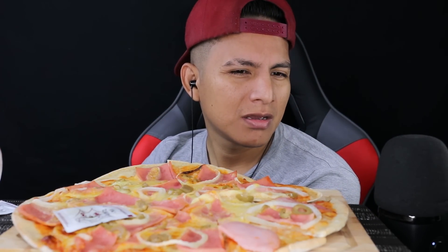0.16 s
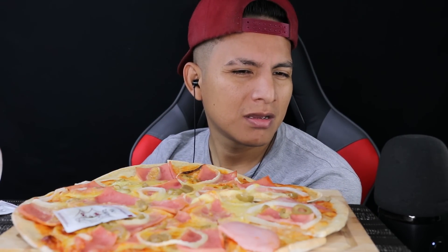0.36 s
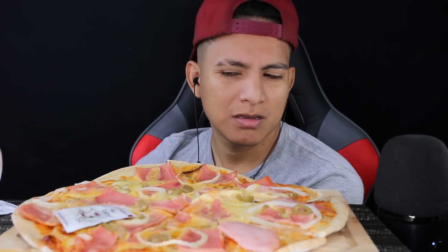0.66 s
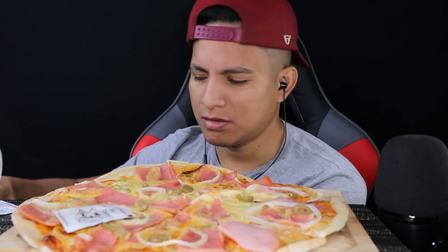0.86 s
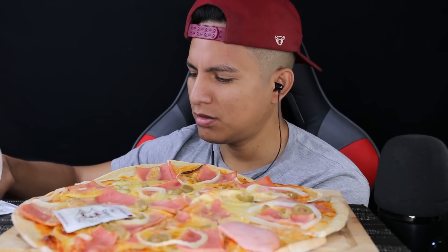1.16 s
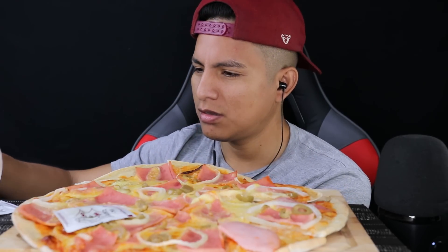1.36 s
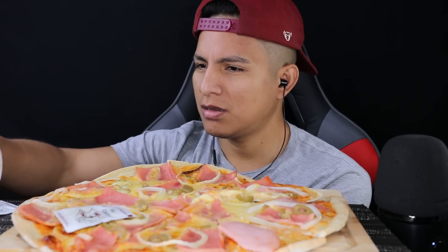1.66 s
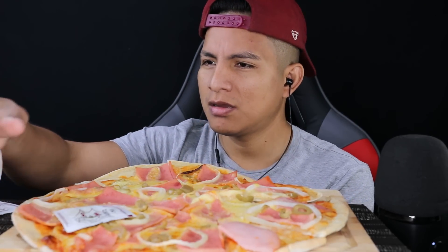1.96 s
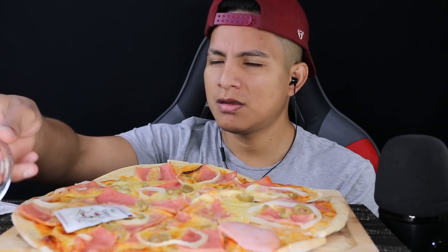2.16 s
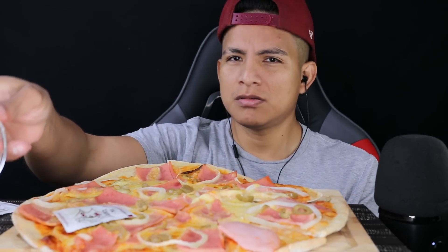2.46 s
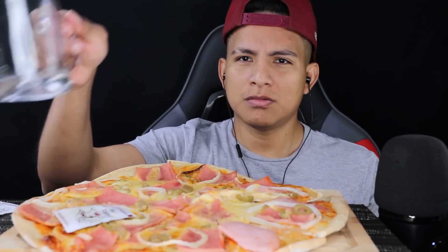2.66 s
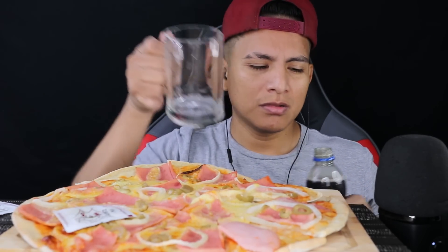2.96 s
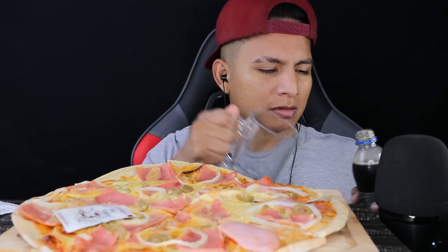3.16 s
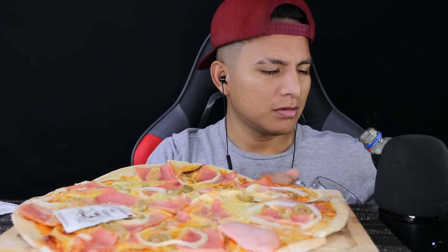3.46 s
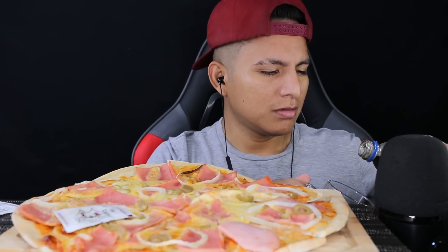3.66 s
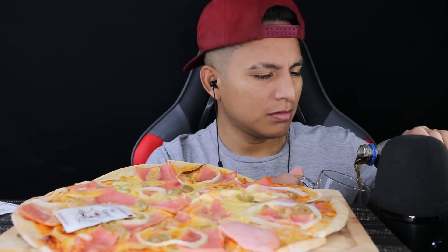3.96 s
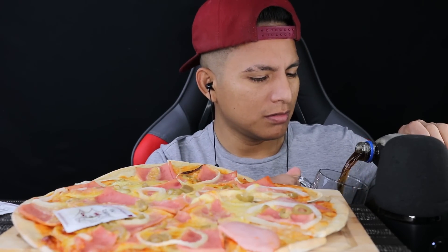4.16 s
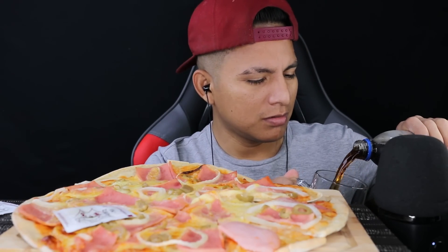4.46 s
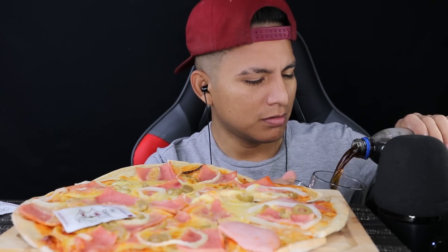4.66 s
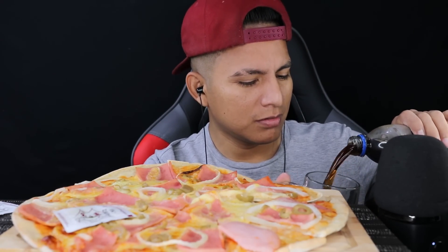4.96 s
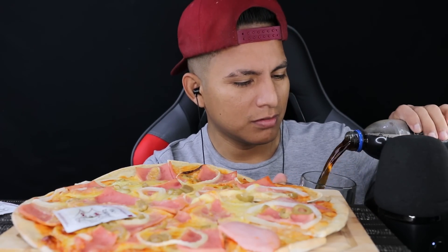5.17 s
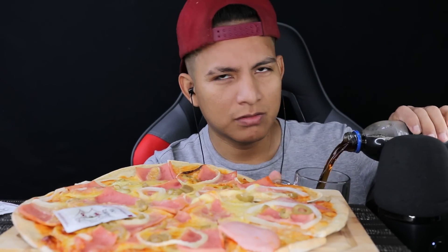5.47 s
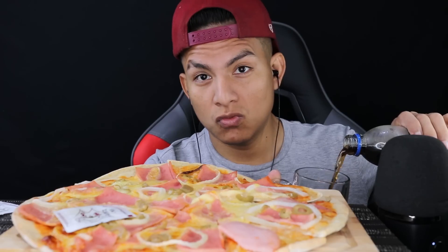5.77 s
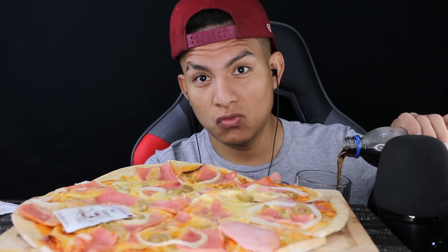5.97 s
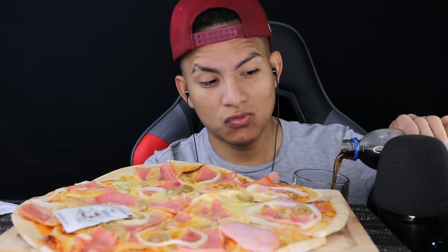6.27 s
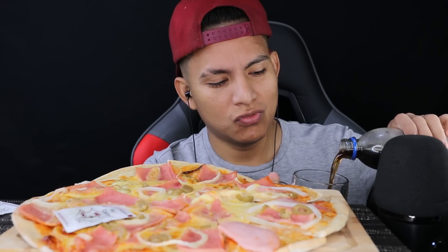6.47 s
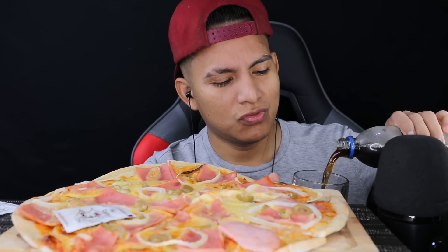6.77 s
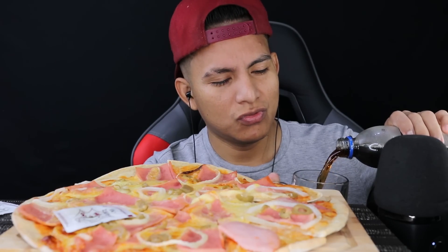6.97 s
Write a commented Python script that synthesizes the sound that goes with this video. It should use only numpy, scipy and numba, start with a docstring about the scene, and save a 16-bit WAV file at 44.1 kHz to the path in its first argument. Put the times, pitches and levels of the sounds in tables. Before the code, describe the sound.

Close stereo microphones at a table catch a strong burst of escaping gas, dulling quickly, and a hard plastic crack with a thump. Sparse clicks, cloth rustle and faint squeaky rubs come next over low room tone. Then soda streams into a glass mug just left of centre: crisp foam fizz, irregular watery plops, glassy ringing, glugs and a climbing pitch, still pouring at the end.

```python
"""A soda bottle is opened at a table in a small quiet room: gas, shaped noise, hisses out at once.
The cap cracks off and a glass mug is fetched: short noise bursts, grainy rustles, slipping groans, low thumps.
Then the drink is poured close by, left of the middle: foam fizzes, splashes ring the glass and the air column
above the drink, whose pitch climbs as the mug fills, while the plastic bottle glugs and pops.
Near the end the bottle hums briefly; room tone and faint hums lie under it all."""
import sys
import numpy as np
from scipy import signal
from scipy.fft import rfft, irfft
from scipy.io import wavfile
from numba import njit

SR = 44100
rng = np.random.default_rng(int(sys.argv[2]) if len(sys.argv) > 2 else 0)


def to_wav(sig):
    """Store sig (one row per channel, or 1-D mono) as 16-bit WAV at the path in sys.argv[1].

    Samples outside -1..1 are clipped; the rate is SR.
    """
    pcm = np.clip(np.atleast_2d(sig), -1, 1) * 32767
    pcm = np.round(pcm).astype(np.int16)
    wavfile.write(sys.argv[1], SR, pcm.T)  # frames by channels


N = 313992

# how alike distant sound is at the two microphones: (frequency [Hz], left-right likeness [-1..1])
FAR_LIKENESS = [(60, 0.26), (240, 0.16), (950, 0.64), (3770, 0.07), (15000, 0.55)]


def from_db(db):
    """Gain of a level in dB."""
    return 10 ** (np.asarray(db) / 20)


def rms_one(x):
    """Scaled to rms 1."""
    return x / np.sqrt(np.mean(x ** 2) + 1e-20)


def peak_one(x):
    """Scaled to peak 1."""
    return x / np.max(np.abs(x))


def in_time(rows):
    """Columns of a curve at every sample."""
    s, *columns = np.transpose(rows)
    return [np.interp(np.arange(N) / SR, s, c) for c in columns]


def during(rows):
    """1 between the first and last row of a curve, with 30 ms fades outside."""
    t = np.arange(N) / SR
    fade_in = np.clip((t - rows[0][0]) / .03 + 1, 0, 1)
    fade_out = np.clip((rows[-1][0] - t) / .03 + 1, 0, 1)
    return fade_in * fade_out


def at_hz(points, hz):
    """A spectrum table read on a log frequency axis."""
    table = np.array(points)
    return np.interp(np.log(hz), np.log(table[:, 0]), table[:, 1])


def drift(rate):
    """Slow random wander of rms 1, faster for a higher rate; made at SR / 40 and interpolated."""
    r = np.exp(-80 * np.pi * rate / SR)
    white = rng.standard_normal(N // 40 + 2002)
    slow = signal.lfilter([1], [1, -2 * r, r * r], white)[2000:]    # skip the filter's start
    return np.interp(np.arange(N) / 40, np.arange(len(slow)), rms_one(slow))


def shaped(white, spectrum, likeness):
    """Two noises become a coloured stereo pair, alike as the table says; rms 1."""
    hz = np.maximum(np.fft.rfftfreq(white.shape[1], 1 / SR), 1)
    mid, side = rfft(white) * from_db(at_hz(spectrum, hz))
    alike = np.clip(at_hz(likeness, hz), -.99, .99)
    pair = np.sqrt(1 + alike) * mid + np.sqrt(1 - alike) * side * [[1], [-1]]
    return rms_one(irfft(pair, white.shape[1]))


def resonance(x, hz, width_hz):
    """Two-pole peak of gain 1."""
    r = np.exp(-np.pi * width_hz / SR)
    poles = [1, -2 * r * np.cos(2 * np.pi * hz / SR), r * r]
    return signal.lfilter([(1 - r * r) / 2, 0, (r * r - 1) / 2], poles, x + 1e-18)


@njit
def moving_resonance(x, hz, width_hz, sr):
    """Two-pole peak whose centre and width move; a unit click rings with height about 1."""
    y = np.zeros(len(x))
    for i in range(2, len(x)):
        w = 2 * np.pi * hz[i] / sr
        r = np.exp(-np.pi * width_hz[i] / sr)
        y[i] = np.sin(w) * x[i - 1] + 2 * r * np.cos(w) * y[i - 1] - r * r * y[i - 2]
    return y


def in_band(x, low_hz, high_hz):
    """Band-pass that roughly keeps the rms of white noise."""
    band = signal.butter(2, [low_hz, high_hz], "band", fs=SR, output="sos")
    return signal.sosfilt(band, x) * np.sqrt(SR / 2 / (high_hz - low_hz))


def narrow_noise(hz, width_hz):
    """A wavering tone of rms 1: noise through a narrow resonance."""
    return rms_one(resonance(rng.standard_normal(N), hz, width_hz))


def add(out, s, sound):
    """Mix a short sound in at s seconds."""
    i = round(s * SR)
    out[..., i:i + sound.shape[-1]] += sound[..., :N - i]


def damped(hz, t60):
    """A decaying sine, 0.3 s long."""
    t = np.arange(round(.3 * SR)) / SR
    return np.sin(2 * np.pi * hz * t) * from_db(-60 * t / max(t60, .002))


def crack(t60, rise_s):
    """A one-sample snap, then a decaying burst of noise, 0.12 s long."""
    t = np.arange(round(.12 * SR)) / SR
    rise = np.clip(t / max(rise_s, 1e-4), 0, 1)
    burst = rng.standard_normal(len(t)) * rise * from_db(-60 * t / max(t60, .001))
    burst[0] = 2.68
    return burst


def grains(per_s, spread_db):
    """Two channels of random clicks of uneven size; rms 1."""
    sizes = from_db(spread_db * np.minimum(rng.exponential(1, (2, N)), 5)) * rng.choice([-1, 1], (2, N))
    return rms_one(sizes * (rng.random((2, N)) < per_s / SR))


def pan(db):
    """Left and right gains for a left-minus-right level in dB."""
    return from_db(np.array([[db / 2], [-db / 2]]))


def room_tone():
    """The quiet room's background: steady coloured noise."""
    # colour of the background: (frequency [Hz], density [dB per Hz])
    tone_colour = [(12, -33.5), (20, -4), (80, -4), (103, -17.5), (148, -12), (238, -20), (289, -35.5),
                   (519, -25), (565, -38.5), (746, -25), (1070, -32.5), (1270, -36.5), (2760, -33.5),
                   (6020, -40), (15500, -34)]
    return from_db(-53) * shaped(rng.standard_normal((2, N)), tone_colour, FAR_LIKENESS)


def hums():
    """Appliances hum as narrow noises; a deep hum near 80 Hz swells and fades."""
    # appliances: (frequency [Hz], width [Hz], rms level [dB])
    hum_rows = [(139.6, 9.2, -64), (169.8, 18, -72.5), (518, 2.4, -72), (756, 10, -84.5)]
    # the deep hum's swells: (time [s], level [dB])
    deep_levels = [(0.0, -38), (0.4, -62.5), (0.85, -78), (1.94, -59.5), (3.3, -69.5), (4.08, -55),
                   (4.84, -52.5), (5.0, -62), (7.12, -74)]
    steady = sum(from_db(db) * narrow_noise(hz, width_hz) for hz, width_hz, db in hum_rows)
    deep_db, = in_time(deep_levels)
    return steady + from_db(deep_db) * narrow_noise(80, 3.9)


def gas():
    """Gas jets from the cap as smooth bright noise that dulls as the pressure drops and the room takes over."""
    # colour of the jet: (frequency [Hz], density [dB per Hz])
    jet_colour = [(180, -52.5), (300, -31.5), (1170, -20.5), (2170, -10), (2700, -10), (2980, -5),
                  (3890, -5.5), (6620, -3), (12100, -3), (16000, -13.5)]
    # stereo likeness of the jet: (frequency [Hz], left-right likeness [-1..1])
    jet_likeness = [(60, 0.91), (130, 0.83), (290, 0.84), (640, 0.91), (1410, 0.89), (3100, 0.65),
                    (6820, 0.076), (15000, 0.11)]
    start_db, peak_db, rise_s, hold_s = -16.5, -10.5, .026, 0.042    # the jet swells and holds
    drop_db, drop_db_per_s, tail_db_per_s = 27, 200, 119    # then drops fast, and the rest fades more slowly
    puff_s, puff_rise_s = 0.417, .11    # the last gas leaves as the seal breaks
    puff_start_db, puff_peak_db, puff_fade_db_per_s = -47, -38, 200
    t = np.arange(N) / SR
    hold_end_s = rise_s + hold_s
    knee_s = hold_end_s + drop_db / drop_db_per_s
    level_db = np.interp(t, [0, rise_s, hold_end_s, knee_s], [start_db, peak_db, peak_db, peak_db - drop_db])
    level_db = level_db - tail_db_per_s * np.maximum(t - knee_s, 0)
    jet = shaped(rng.standard_normal((2, N)), jet_colour, jet_likeness)
    dull = rms_one(signal.sosfilt(signal.butter(2, 7000, fs=SR, output="sos"), jet))
    late = np.clip((t - .08) / .15, 0, 1)
    puff_db = np.interp(t - puff_s, [0, puff_rise_s], [puff_start_db, puff_peak_db])
    puff_db = puff_db - puff_fade_db_per_s * np.maximum(t - puff_s - puff_rise_s, 0)
    puff = (t > puff_s) * from_db(puff_db) * jet
    return from_db(level_db + 1.0 * drift(40)) * ((1 - late) * jet + late * dull) + puff


def thumps():
    """Jolts through the table and puffs on the microphones: decaying low sines under a gentle low-pass."""
    # pushes: (time [s], level [dB], frequency [Hz], 60 dB decay [s], left-right level [dB])
    pushes = [(0.018, -22, 21.5, 0.2, 0), (0.086, -21.5, 21.6, 0.17, 0), (0.523, -14, 36.3, 0.03, -2),
              (2.22, -40, 53.7, 0.44, -13), (2.94, -39.5, 111, 0.13, -14), (4.211, -37, 57.5, 0.12, 15.5),
              (4.549, -31.5, 116, 0.067, 13), (4.797, -26, 30.8, 0.061, 20), (5.258, -25, 76.5, 0.042, 8),
              (5.283, -34.5, 32.3, 0.2, 14), (5.485, -14.5, 37.4, 0.045, 0.0)]
    out = np.zeros((2, N))
    for s, level_db, hz, t60, side_db in pushes:
        add(out, s, -from_db(level_db) * pan(side_db) * damped(hz, t60))
    return signal.sosfilt(signal.butter(1, 350, fs=SR, output="sos"), out)


def rustle():
    """Hands, sleeve and chair move: grainy friction, its brightness tilted about 1.5 kHz."""
    # strength of the movement: (time [s], level [dB])
    moves = [(0.2, -57.5), (0.46, -51.5), (0.6, -51.5), (1.37, -59), (2.12, -59.5), (2.26, -54.5),
             (2.62, -57), (2.98, -57.5), (3.18, -60.5), (4.1, -62.5)]
    # colour of the friction before the tilt: (frequency [Hz], density [dB per Hz])
    rub_colour = [(59, -58), (100, 1), (185, 0.5), (389, -5), (481, -9.5), (910, -11.5), (3860, -8.5),
                  (10200, -12.5), (14100, -20), (16000, -50)]
    tilt = from_db(-3)    # gain on the treble, inverse on the bass; negative dB dulls the rub
    level_db, = in_time(moves)
    rub = shaped(grains(2500, spread_db=2.5), rub_colour, FAR_LIKENESS)
    low = signal.sosfilt(signal.butter(1, 1500, fs=SR, output="sos"), rub)
    tilted = low / tilt + (rub - low) * tilt
    return from_db(level_db + 2.0 * drift(8.5)) * during(moves) * tilted


def knocks():
    """Contacts of cap, bottle and mug: bursts in four bands; returns them dry and the snaps sent to the room."""
    # contacts: (time [s], body [dB], knock [dB], clack [dB], left-right level [dB])
    contacts = [(0.258, -38, -65, -48, 0), (0.271, -33.5, -54, -28.5, 2), (0.416, -52, -59, -31, 0),
                (0.433, -48, -45, -28, 3), (0.47, -27, -40, -15, 1.5), (0.487, -38, -41, -25, 3),
                (0.511, -12, -28, -6, 2), (0.529, -48, -52, -17.5, 4), (0.683, -37, -58, -34, 2),
                (0.771, -45, -61, -46, -1), (0.821, -33.5, -44, -45, 0), (0.868, -55, -60, -41, 1.5),
                (0.887, -37, -50, -41, 0), (0.936, -36.5, -60, -54, 0), (0.962, -31.5, -45, -39, 1),
                (1.037, -42, -48, -43, 0), (1.051, -39, -33.5, -42, 0), (1.08, -54, -34.5, -31, -1),
                (1.093, -38.5, -50, -35, 0), (1.637, -51.5, -47.5, -49, 6), (1.787, -58, -44.5, -48, -5),
                (1.812, -35, -42, -31.5, -7), (2.099, -39, -60, -38.5, -6.5), (2.13, -39, -52, -45, -8),
                (2.173, -31.5, -60, -40, -7), (2.188, -53, -39, -37, -7), (2.207, -34, -60, -55, -5),
                (2.275, -41, -60, -58, -3), (2.336, -39.5, -54, -50, -6), (2.608, -43, -52, -27, 3.5),
                (2.953, -30.5, -29, -30, 4), (2.974, -33.5, -53, -45, -2)]
    # body, knock, clack and treble tick: (low edge [Hz], high edge [Hz])
    bands = [(600, 1500), (150, 600), (2200, 5000), (5000, 15000)]
    # the hands move nearer and further: (time [s], share sent to the room [dB])
    reach = [(0.25, 3), (0.55, -1.5), (0.7, -5), (1.1, -2), (1.8, 3), (2.25, 2), (2.6, -5), (2.95, 4)]
    tick_db, t60_s = -10.5, 0.012    # tick against the clack; decay of the burst
    cap_off_s, cap_hz, cap_width_hz, cap_ring_db = .7, 3810, 150, -3.5    # the cap's own ring
    out, sent = np.zeros((2, N)), np.zeros(N)
    click = signal.unit_impulse(round(.03 * SR))
    snaps = np.array([peak_one(in_band(click, *band)) for band in bands])
    for s, body_db, knock_db, clack_db, side_db in contacts:
        gains = from_db([body_db, knock_db, clack_db, clack_db + tick_db])
        burst = sum(gain * peak_one(in_band(crack(t60_s, rise_s=0.00021), *band))
                    for gain, band in zip(gains, bands))
        snap = from_db(np.interp(s, *np.transpose(reach))) * (gains @ snaps)
        if s < cap_off_s:    # the cap still rings while it is being twisted off
            burst = burst + from_db(cap_ring_db) * resonance(burst, cap_hz, cap_width_hz)
            snap = snap + from_db(cap_ring_db) * resonance(snap, cap_hz, cap_width_hz)
        add(out, s, pan(side_db) * burst)
        add(sent, s, snap)
    return out, sent


def room(x):
    """The room answers with a noise tail that dies octave by octave, partly alike at the two microphones."""
    # decay of the room: (frequency [Hz], 60 dB decay [s])
    decay = [(100, 0.28), (1000, 0.3), (5000, 0.44), (15000, 0.13)]
    t, tail = np.arange(round(.6 * SR)) / SR, 0
    for hz in 90 * 2. ** np.arange(8):
        edges = [hz / np.sqrt(2), min(hz * np.sqrt(2), .45 * SR)]
        band = signal.butter(2, edges, "band", fs=SR, output="sos")
        octave = signal.sosfilt(band, rng.standard_normal((2, len(t))))
        tail = tail + octave * from_db(-60 * t / at_hz(decay, hz))
    tail = tail + 0.38 * tail[::-1]    # the microphones are close together
    tail = tail * np.clip(t / 0.0045, 0, 1)    # the first echoes need a few ms
    return signal.fftconvolve(x[None], tail / np.sqrt(np.sum(tail ** 2) / 2), axes=1)[:, :N]


def groans():
    """Chair, table and fingers rub, and the drink sloshes in the bottle: uneven slips excite a sliding
    resonance."""
    # rubs: (time [s], level [dB], start [Hz], end [Hz], width [Hz], length [s], slips [per s])
    rubs = [(0.401, -45.5, 3900, 3900, 900, 0.11, 3800), (.8, -51.5, 2930, 3150, 1800, 0.3, 1600),
            (1.06, -46, 301, 484, 30, 0.15, 4100), (1.058, -52.5, 1700, 2100, 200, 0.13, 3700),
            (1.931, -62, 2550, 2350, 300, 0.28, 210), (2.081, -52, 950, 800, 450, 0.33, 220),
            (2.681, -51.5, 240, 221, 40, .07, 4000), (2.942, -49.5, 2500, 1500, 4000, .13, 2500),
            (3.451, -66, 2790, 2405, 250, 0.46, 90)]
    out = np.zeros(N)
    for s, level_db, start_hz, end_hz, width_hz, length, per_s in rubs:
        count = round(length * SR)
        slips = rng.standard_normal(count) * (rng.random(count) < per_s / SR)
        hz = np.linspace(start_hz, end_hz, count)
        rub = moving_resonance(slips, hz, np.full(count, float(width_hz)), SR)
        swell = np.sin(np.pi * np.linspace(0, 1, count) ** 0.61) ** 2
        add(out, s, from_db(level_db) * swell * rms_one(rub))
    return out


def foam():
    """Foam hisses: dense tiny clicks, coloured, with a flickering level."""
    # strength of the foam: (time [s], level [dB])
    fizz = [(4.05, -77.5), (4.19, -44.5), (4.32, -39.5), (4.38, -50.5), (4.66, -47.5), (5.62, -47.5),
            (6.08, -46), (7.12, -44.5)]
    # colour of the foam: (frequency [Hz], density [dB per Hz])
    foam_colour = [(900, -36), (1500, -23), (2000, -24), (3000, -13), (4500, -8.5), (6000, -8.5),
                   (8500, -3), (10000, -7), (12000, -5), (14000, -6.5), (15500, -11.5)]
    # stereo likeness of the near foam: (frequency [Hz], left-right likeness [-1..1])
    near_likeness = [(60, 0.23), (120, 0.56), (240, 0.73), (480, 0.95), (950, 0.99), (1890, 0.98),
                     (3770, 0.65), (7520, -0.33), (15000, -0.42)]
    level_db, = in_time(fizz)
    hiss = shaped(grains(9000, spread_db=3.0), foam_colour, near_likeness)
    return from_db(level_db + .7 * drift(25)) * hiss


def air_column(churn, hz, width_hz, level_db):
    """The churning stream stirs the air above the drink: its lowest mode and a weaker one at three times that."""
    wobble = from_db(.3 * drift(24))    # the rough surface shakes the pitch
    first = rms_one(moving_resonance(churn[0], hz * wobble, width_hz, SR) * np.sqrt(width_hz))
    third = rms_one(moving_resonance(churn[1], 3 * hz * wobble, 5.7 * width_hz, SR) * np.sqrt(width_hz))
    third_db = level_db - 10 + drift(13)
    return from_db(level_db + drift(4.6)) * first + from_db(third_db) * third


def glass(x, damping):
    """Wall modes and cross modes of the mug, widened as the drink damps them."""
    # modes: (frequency [Hz], width before damping [Hz], level [dB])
    modes = [(3103, 83, 4), (3866, 210, 1), (5110, 210, -7.5), (5700, 125, -3), (5040, 100, -19),
             (6500, 200, -7)]
    out = np.zeros(N)
    for hz, width_hz, db in modes:
        patchy_db = 4 * drift(11.4)    # each mode comes and goes as the stream wanders
        ring = moving_resonance(x, np.full(N, float(hz)), width_hz * damping, SR)
        out += from_db(db + patchy_db) * width_hz / SR * ring
    return out


def gurgle():
    """Large bubbles, each ringing briefly at one of twelve low pitches; rms 1."""
    born = grains(1100, spread_db=2.5)[0]
    pitches_hz, dealt = np.geomspace(280, 1900, 12), rng.integers(0, 12, N)
    return rms_one(sum(resonance(born * (dealt == k), hz, hz / 1.9) for k, hz in enumerate(pitches_hz)))


def splashes(hz, width_hz):
    """Each splash traps a bubble, jolts the air column, cracks on the glass and sprays; low pops join in."""
    # splashes in the mug: (time [s], bubble [dB], crack [dB])
    drops = [(4.421, -55, -47), (4.436, -53, -42), (4.475, -44, -46), (4.521, -33.5, -27),
             (4.526, -23.5, -15.5), (4.622, -32.5, -38), (4.631, -30.5, -37), (4.64, -41, -32),
             (4.663, -46, -33), (4.682, -33.5, -33.5), (4.705, -30.5, -26), (4.719, -45, -34),
             (4.725, -35, -23), (4.758, -26.5, -29.5), (4.921, -21, -28.5), (4.936, -33, -28.5),
             (4.979, -35, -36), (5.002, -30, -41), (5.018, -22.5, -31), (5.036, -18, -25.5),
             (5.042, -10.5, -26.5), (5.053, -32, -44), (5.074, -22.5, -38), (5.103, -19.5, -30.5),
             (5.112, -28, -31), (5.223, -37, -39), (5.237, -20, -32), (5.251, -22, -33), (5.281, -33, -37),
             (5.359, -34, -48), (5.438, -21, -32.5), (5.453, -22, -32), (5.461, -34, -35),
             (5.472, -5.5, -16), (5.494, -17.5, -37), (5.627, -27, -37), (5.686, -28, -50),
             (5.7, -26.5, -50), (5.773, -30, -47), (5.785, -23.5, -42), (6.017, -25, -41),
             (6.028, -25, -43)]
    # drops burst with a bright snap: (time [s], peak level [dB])
    bright_snaps = [(4.526, -18.5), (4.641, -25), (4.725, -34), (5.036, -24), (5.103, -22.5),
                    (5.473, -13.5), (5.879, -34)]
    # low pops of the bottle, and the knock that starts a thump:
    # (time [s], level before swell and decay [dB], starting pitch [Hz])
    low_pops = [(4.213, -33, 224), (4.537, -39.5, 223), (4.71, -40, 250), (4.797, -34, 150),
                (4.982, -36, 256), (5.036, -30, 570), (5.042, -42, 538), (5.104, -42, 420),
                (5.257, -36, 160), (5.437, -34, 407), (5.462, -42, 406), (5.472, -9, 388),
                (5.494, -21.5, 380), (5.627, -44, 291), (5.686, -32, 290), (5.773, -47, 266),
                (6.017, -27, 237)]
    bubble_start_hz, follows, scatter = 778.5, .45, 0.048    # empty mug; power of the column's climb; spread
    big_db, big_drop_per_db = -16, .014    # above this level bubbles are larger and lower
    spray_base_db, spray_growth = -41, 1.13    # for a crack of -30.5 dB; dB per dB of crack
    hits, bubbles, cracks, spray, pops = np.zeros((5, N))
    t = np.arange(round(.1 * SR)) / SR
    swell = np.clip(t / 0.0013, 0, 1)    # liquid lands softly
    for (s, bubble_db, crack_db), chance in zip(drops, rng.standard_normal(len(drops))):
        i = round(s * SR)
        bubble_hz = bubble_start_hz * (hz[i] / hz[0]) ** follows * (1 + scatter * chance)
        bubble_hz *= 1 - big_drop_per_db * max(bubble_db - big_db, 0)
        spray_db = spray_base_db + spray_growth * (crack_db + 30.5)
        hits[i] += from_db(bubble_db - 6.5)
        chirp = np.sin(2 * np.pi * bubble_hz * t * (1 + 2.4 * t))    # pitch rises
        add(bubbles, s, swell * from_db(bubble_db - 2.0 - 60 * t / 0.029) * chirp)
        add(cracks, s, from_db(crack_db) * peak_one(in_band(crack(0.0081, rise_s=0.00042), 1400, 4270)))
        add(spray, s, from_db(spray_db) * peak_one(in_band(crack(0.022, rise_s=0.0011), 4500, 18000)))
    for s, snap_db in bright_snaps:
        add(spray, s, from_db(snap_db) * peak_one(in_band(crack(0.0095, rise_s=0.00025), 4000, 18000)))
    for s, pop_db, pop_hz in low_pops:
        chirp = np.sin(2 * np.pi * pop_hz * t * (1 + 6.8 * t))
        add(pops, s, swell * from_db(pop_db - 60 * t / 0.03) * chirp)
    hits = signal.sosfilt(signal.butter(1, [500, 2200], "band", fs=SR, output="sos"), hits)
    column = moving_resonance(hits, hz, 0.87 * width_hz, SR)
    # a closed pipe rings at odd multiples
    third = from_db(-23) * moving_resonance(cracks, 3 * hz, 3 * width_hz, SR)
    walls = from_db(22.0) * glass(cracks, (width_hz / width_hz[0]) ** 1.9)
    mouth = signal.butter(3, 560, "high", fs=SR, output="sos")    # the mouth radiates little below its column
    return signal.sosfilt(mouth, column + bubbles + third + cracks + walls + spray) + pops


def pour():
    """The stream fizzes, gurgles and splashes, exciting air column and glass; returns stereo and the mug alone."""
    # the mug fills: (time [s], air column pitch [Hz])
    fill = [(4.1, 770), (4.7, 772), (5.9, 1030), (6.4, 1030), (7.12, 1180)]
    # the stream stirs the air column: (time [s], level [dB])
    stream = [(4.05, -85), (4.38, -69), (4.6, -59), (4.71, -48.5), (5.02, -55.5), (5.33, -47.5),
              (5.59, -45.5), (6.19, -43.5), (7.12, -44)]
    empty_width_hz, widening = 69, 3.1    # air column in the empty mug; power of the climb in pitch
    gurgle_start_db, gurgle_db_per_octave = -23, 31.5    # against the column; grows as its pitch climbs
    walls_s, walls_rise_s, walls_start_db, walls_fade_db_per_s = 4.24, 0.071, -49.5, 1    # stream meets glass
    start_side_db, side_db_per_octave = 5, -4    # left-right; the surface rises towards the middle
    t = np.arange(N) / SR
    hz, = in_time(fill)
    climb = hz / hz[0]
    octaves = np.log2(climb)
    width_hz = empty_width_hz * climb ** widening
    column_db, = in_time(stream)
    churn = grains(3000, spread_db=2.0)
    column = air_column(churn, hz, width_hz, column_db)
    wetted = np.clip((t - walls_s) / walls_rise_s, 0, 1)
    wetted = wetted * from_db(walls_start_db - walls_fade_db_per_s * (t - walls_s))
    ringing = rms_one(glass(churn[1], (width_hz / width_hz[0]) ** 1.5))
    walls = wetted * from_db(1.95 * drift(11)) * ringing
    gurgling = from_db(column_db + gurgle_start_db + gurgle_db_per_octave * octaves) * gurgle()
    pouring = during(stream)
    mug = pouring * (column + walls + gurgling) + splashes(hz, width_hz)
    side_db = start_side_db + side_db_per_octave * octaves
    sides = from_db(np.array([side_db / 2, -side_db / 2]))
    both = np.array([mug, np.roll(mug, 1)])    # the right microphone hears it one sample later
    return sides * (pouring * foam() + both), mug


def bottle_hum():
    """Air in the emptying bottle hums: a soft watery tone that swells and stops."""
    start_s, length_s = 6.72, 0.337
    t = np.arange(N) / SR - start_s
    swell = np.clip(np.minimum(t / 0.051, (length_s - t) / .04 + 1), 0, 1)
    return from_db(-46) * swell * narrow_noise(680, 12)    # Hz, width in Hz


def scene():
    """Near pour on the left, handling further off, with the room's echoes of knocks and mug."""
    background = room_tone() + hums()
    handled, sent = knocks()
    handling = gas() + thumps() + rustle() + handled + groans()
    poured, mug = pour()
    echoes = room(sent + from_db(-13.5) * mug)
    return background + handling + poured + bottle_hum() * pan(2.7) + echoes


def record(dry):
    """The top is cut steeply above 15.75 kHz, then overload clips the peaks."""
    top_cut = signal.ellip(10, .3, 70, 15750, fs=SR, output="sos")
    return np.clip(signal.sosfilt(top_cut, dry), -1, 1)


dry = scene()
out = record(dry)
to_wav(out)
```